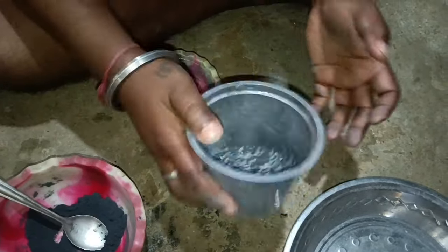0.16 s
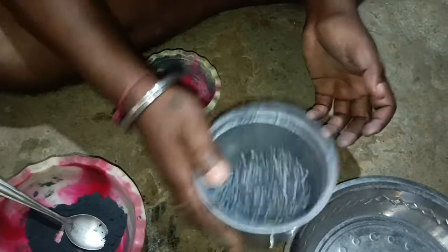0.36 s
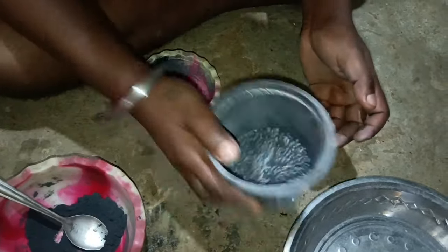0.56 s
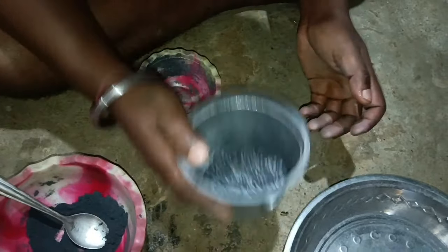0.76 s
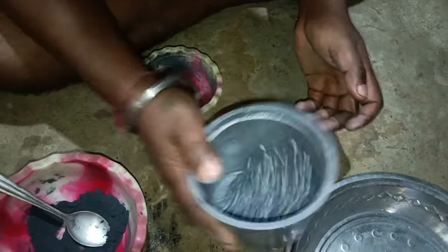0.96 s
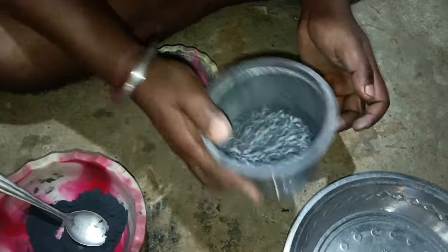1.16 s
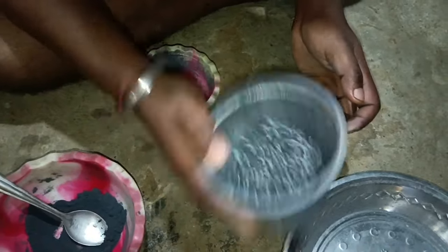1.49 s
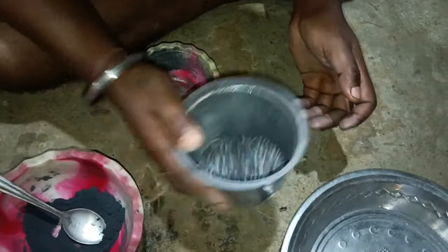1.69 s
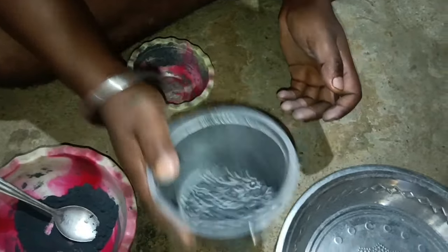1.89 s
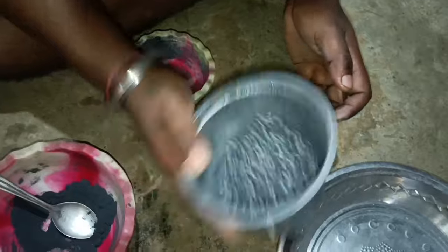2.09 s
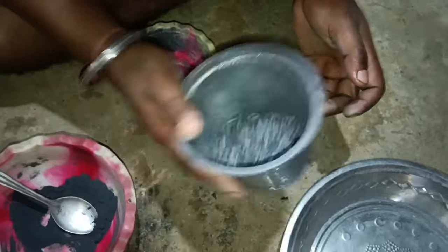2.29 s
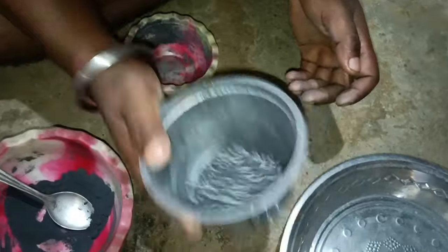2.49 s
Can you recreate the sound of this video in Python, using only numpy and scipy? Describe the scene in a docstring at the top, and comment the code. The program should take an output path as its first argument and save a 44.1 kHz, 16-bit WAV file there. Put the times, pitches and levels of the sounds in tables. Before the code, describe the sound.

Bright, busy rattling of tiny pellets swirled to and fro inside a small metal cup indoors

```python
"""A bright, busy rattle close to a phone: small hard pellets slide to and fro in a hand-held steel cup,
about seven strokes a second. Thousands of tiny ticks are short resonances hit by random blows.
Rolling pellets and heavier knocks ring the hollow of the cup, damped by the hand; single ticks crack on top.
Behind it a low rumble of coloured noise comes and goes, with a brief wavering hum and dull thuds."""
import sys
import numpy as np
from scipy import signal
from scipy.fft import rfft, irfft
from scipy.io import wavfile

SR = 44100
rng = np.random.default_rng(int(sys.argv[2]) if len(sys.argv) > 2 else 0)


def master_out(mix):
    """Clip the mix to full scale and print it as 16-bit PCM to the path in sys.argv[1]."""
    frames = np.transpose(np.atleast_2d(mix))
    ceiling = np.clip(frames, -1, 1)
    pcm = np.round(ceiling * 32767).astype(np.int16)
    wavfile.write(sys.argv[1], SR, pcm)


N = 116865

LAG_S = .0001  # every blow reaches the left this much after the right, before any further lag
TICK_LAG_S, TICK_LAG_SPREAD_S = .00007, .00011  # extra lag of the ticks, and its scatter
KNOCK_LAG_SPREAD_S = .00005

# Strokes of the pellets, as mix automation before each layer's fixed trim: t/s, tick level/dB,
# hollow over ticks level/dB, top treble level/dB (only its swing about the mean counts),
# low rings over ticks level/dB
STROKES = [(0.0, -47, 6, -7, -25), (0.04, -51, 1, -21, -32), (0.07, -52, 15.5, -3, -9),
           (0.12, -28.5, 2.5, -19.5, -5.5), (0.17, -36.5, 8, -11.5, -3.5), (0.24, -32, -1.5, -14, -20),
           (0.25, -27.5, -25, -15, -24), (0.26, -33.5, -6, -9, -20), (0.3, -37, -10, -11, -7),
           (0.35, -32.5, 10.5, -12.5, -9.5), (0.38, -36, 10, -10, -3), (0.41, -42.5, 8, -14, 1),
           (0.45, -30, 1.5, -10, -13), (0.5, -25.5, -4, -17.5, -28), (0.57, -38, 2, -17, -42),
           (0.6, -26.5, -6.5, -16, -35), (0.62, -26.5, 6.5, -14, -47), (0.66, -30, 5.5, -17, -23),
           (0.69, -45, 13.5, -8.5, 8), (0.74, -26.5, 4.5, -15, -3.5), (0.83, -30, 0, -20, -4.5),
           (0.89, -33, 3.5, -18.5, 4), (0.91, -26, 3.5, -17, -11), (1.0, -40.5, 10.5, -14, -2),
           (1.05, -24, -0.5, -13.5, -16), (1.13, -31.5, 0.5, -17, -21), (1.14, -35, -2, -12, -35),
           (1.15, -38, 1, -14, -23), (1.19, -27, -1, -20.5, -9), (1.22, -27, 12, -10, -4),
           (1.28, -43, 7.5, -16.5, -2), (1.34, -25, 1, -15.5, -13.5), (1.38, -28.5, 2.5, -17.5, -16),
           (1.42, -36, 8.5, -18, -18), (1.45, -34, -2, -15, -12), (1.53, -26, 8, -19, -10),
           (1.55, -34, 9, -19, 2), (1.58, -37.5, 11, -12, -5), (1.65, -27.5, 2, -14.5, -10.5),
           (1.73, -33.5, 2, -15, -30), (1.76, -30.5, -4, -17, -30), (1.78, -26, 2.5, -19.5, -9.5),
           (1.87, -38, 9.5, -13.5, -2), (1.91, -31, 6.5, -13, -15), (1.93, -24, -3, -22, -21),
           (1.95, -30, 1.5, -15, -13.5), (2.01, -31, 4, -17.5, -18), (2.02, -31, 0, -23, -16),
           (2.03, -32.5, 0.5, -14, -9), (2.07, -30.5, 4, -16, -18), (2.08, -27.5, 0, -20, -7),
           (2.1, -26.5, 6, -12, -15), (2.16, -40, 11, -16.5, -6), (2.21, -29.5, 0.5, -13, -15),
           (2.27, -29.5, 1.5, -16.5, -13.5), (2.35, -36.5, 6.5, -12.5, -12), (2.38, -27.5, 2.5, -16, -8.5),
           (2.42, -29, 6.5, -16.5, -5), (2.44, -36.5, 10.5, -10, 3), (2.46, -39, 11.5, -13, -1),
           (2.55, -27, 1, -17, -8.5), (2.61, -34, 4.5, -17, -18), (2.65, -35, 3, -11, -1)]
# Tone colour of the ticks: f/Hz, relative level/dB
TICK_COLOUR = [(650, -7.5), (1100, -1), (1430, -1.5), (1710, 2), (1890, -3), (2040, 0), (2460, -3.5),
               (3500, -3.5), (4880, -6), (6360, -15.5), (7670, -8), (8760, -16.5), (9050, -31.5),
               (9350, -47.5), (10100, -28.5), (11400, -37), (12700, -34.5), (15400, -50)]
# The cup drifts to the right: t/s, left minus right level/dB
DRIFT = [(0, 1), (1.3, 0), (2.3, -0.9), (2.65, -3.5)]
TICK_RATE, TICK_SCATTER_DB, TICK_Q = 600, 1.5, 8  # rate is ticks a second in each pitch range
FINE_HZ, FINE_DENSER = 9000, 8  # above this pitch the tick rate is this many times higher
SHARED_PER_S, SHARED_DB, SHARED_SCATTER_DB = 300, -10, 2.5  # ticks that sound at all pitches up to FINE_HZ


def ticks():
    """Pellet on pellet and on steel: blows ring short resonances at all pitches, following the strokes."""
    out = 0
    shared = undb(SHARED_DB) * hail(SHARED_PER_S, SHARED_SCATTER_DB, TICK_LAG_SPREAD_S, TICK_LAG_S)
    level, top = curve(STROKES, column=1), curve(STROKES, column=3)
    for hz in 1000 * 2 ** np.arange(0, 4, .16):
        fine = hz > FINE_HZ  # the highest pitches blur into a hiss
        rate = TICK_RATE * (FINE_DENSER if fine else 1)
        hits = hail(rate, TICK_SCATTER_DB, TICK_LAG_SPREAD_S, TICK_LAG_S)
        if not fine:
            hits = hits + shared
        # the treble swing fades in from 4 to 8 kHz
        bright_db = np.clip(np.log2(hz / 4000), 0, 1) * (top - top.mean())
        band = signal.lfilter(*signal.iirpeak(hz, TICK_Q, SR), hits)
        out = out + band * undb(bright_db) * patches()

    def tilt(hz):
        below_1k = np.maximum(np.log2(1000 / hz), 0)
        return at_hz(TICK_COLOUR, hz) - 24 * below_1k

    pan_db = curve(DRIFT, column=1) * np.array([[.5], [-.5]])
    return unit(colour(out, tilt)) * undb(level + 2.5 + pan_db)


# Modes of the cup's hollow: f/Hz, relative level/dB, t60/s
HOLLOW = [(601, -6.5, 0.08), (678, 6.5, 0.031), (794, -9.5, 0.056), (784, 11.5, 0.028), (899.7, 6, 0.033),
          (872, 1.5, 0.063), (952, 7, 0.022), (1204, -8, 0.051)]
HOLLOW_WANDER = 0.028  # share by which each mode slides as the grip shifts
ROLL_PER_S, ROLL_SCATTER_DB = 300, 1  # small knocks, for each mode


def roll():
    """One hit in a stream of small random knocks after another, as rolling pellets strike the cup."""
    return hail(ROLL_PER_S, ROLL_SCATTER_DB, KNOCK_LAG_SPREAD_S)


def rolling_hollow():
    """Rolling pellets ring the damped hollow; each mode is struck from other spots and slides in pitch."""
    out = 0
    for hz, db, t60 in HOLLOW:
        pitch = hz * (1 + HOLLOW_WANDER * wander(11))
        out = out + undb(db) * sliding_ring(roll(), pitch, t60)
    return unit(out) * undb(curve(STROKES, column=1) + curve(STROKES, column=2) - 1.5)


# Heavier knocks on the cup: t/s, level/dB before trim and sharing among modes, f/Hz
KNOCKS = [(0.083, -20.5, 600), (0.346, -11, 840), (0.401, -11, 840), (0.454, -12, 745), (0.472, -12, 722),
          (0.624, -38, 990), (0.644, -20, 830), (0.708, -25, 724), (0.73, -17, 836), (0.827, -12.5, 486),
          (0.881, -14, 584), (0.917, -12, 810), (0.997, -14, 800), (1.062, -14, 880), (1.19, -14, 800),
          (1.241, -8.5, 785), (1.501, -10, 690), (1.607, -9, 700), (1.66, -10, 840), (1.778, -25, 845),
          (1.815, -6.5, 910), (1.838, -16, 780), (1.901, -7.5, 732), (1.968, -13.5, 715), (2.095, -11, 870),
          (2.143, -9, 830), (2.205, -19, 726), (2.238, -13.5, 870), (2.396, -13.5, 844), (2.44, -12, 780)]
KNOCK_OCTAVES, KNOCK_DB = .22, -1.5  # how far a knock reaches to other modes; trim of all knocks
KNOCK_PUSH_S, KNOCK_REBOUNDS = .0007, 2  # length of each soft push; further landings after the first


def knocks():
    """Heavy knocks excite the hollow, most strongly in the modes near each knock's own pitch."""
    t, knock_db, pitch = np.array(KNOCKS).T
    spot = rng.standard_normal(len(t))
    near = []
    for hz, db, _ in HOLLOW:
        octaves = np.log2(pitch / hz)
        near.append(undb(db) * np.exp(-(octaves / KNOCK_OCTAVES) ** 2))
    near = np.array(near)
    push = np.hanning(int(KNOCK_PUSH_S * SR) + 2)
    out = 0
    for (hz, _, t60), share in zip(HOLLOW, near / near.sum(0)):
        size = undb(knock_db + KNOCK_DB) * share / KNOCK_REBOUNDS
        # a clump of pellets lands over a few swings of the wall
        hit = sum(blows(t + k / pitch, size, KNOCK_LAG_SPREAD_S, spot) for k in range(KNOCK_REBOUNDS + 1))
        out = out + ring(signal.lfilter(push / push.sum(), 1, hit), hz, t60)
    return out


# Lower rings of the cup: f/Hz, relative level/dB, t60/s
LOW_RINGS = [(349, -2, 0.047), (420.3, -0.5, 0.076), (485, -1.5, 0.063)]


def low_rings():
    """Rolling pellets also ring the cup's lower modes, which hold their pitch."""
    out = unit(sum(undb(db) * ring(roll(), hz, t60) for hz, db, t60 in LOW_RINGS))
    return out * undb(curve(STROKES, column=1) + curve(STROKES, column=4) - 4.5)


# Single sharp ticks: t/s, level/dB of the blow, f/Hz, left minus right level/dB,
# crack relative level/dB
CLICKS = [(.2048, -19.5, 3300, -1, -1.5), (.2292, -17.5, 2700, -13, -16), (0.2486, -14, 3160, -3, 1),
          (0.2662, -27, 3300, -5, 2), (.278, -21.5, 3100, -9, -19), (.308, -20, 3840, -3, -12),
          (0.337, -21, 3900, 0, -18), (0.377, -27.5, 4470, -9, 5.5), (0.5917, -31, 1520, 0, 2),
          (0.8808, -17, 1230, -7, -19), (1.026, -24, 2600, -7, -3), (1.1354, -14, 3620, -6, -11),
          (1.328, -20, 4500, -6, -6), (1.6266, -17.5, 2850, -5, 0), (1.632, -25, 3250, -5, -3),
          (1.65, -26, 2090, -5, -7), (1.774, -16, 2800, -3, -25), (1.796, -12, 2820, -8, -24),
          (1.8173, -15, 1720, -7, -14), (1.9257, -19, 3300, -4, -2), (2.018, -16, 2930, -9, -19),
          (2.0764, -17, 2240, -3, -4.5), (2.208, -18, 2150, -5, -3), (2.368, -17.5, 2200, -9, -20),
          (2.633, -22, 2800, -9, 0)]
# Wide crack on top of each: f/Hz, relative level/dB, t60/s
CRACK = [(5300, 0, .005), (7700, -3, .004)]
CLICK_T60_S, CLICK_TOP_HZ = .0055, 9000


def clicks():
    """Sharp single ticks: one blow drives a short ring and a wide crack of higher modes."""
    out = 0
    for t, db, hz, pan_db, crack_db in CLICKS:
        blow = blows(np.array([t]), undb(db), 0, 0)[0]
        crack = sum(undb(crack_db + d) * ring(blow, f, t60) for f, d, t60 in CRACK)
        click = ring(blow, hz, CLICK_T60_S) + crack
        out = out + click * undb(np.array([[.5], [-.5]]) * pan_db)
    return signal.sosfilt(signal.ellip(6, .5, 35, CLICK_TOP_HZ, fs=SR, output="sos"), out)


# Stereo colour of ticks, hollow and low rings: f/Hz, left minus right level/dB
LEFT_OVER_RIGHT = [(60, -17.5), (110, 4), (200, 6), (380, -2), (700, -2.0), (1290, 0), (2370, -10),
                   (4380, -1.5), (8080, 0), (14900, -1.5)]
CUP_LOW_HZ, HOLLOW_LOW_HZ = 281, 487  # the small cup sends out little below these


def cup():
    """Mix of all cup layers, thinned in the bass because a small cup radiates little there."""
    body = ticks() + low_rings() + high_pass(rolling_hollow() + knocks(), 3, HOLLOW_LOW_HZ)
    sides = []
    for side, sign in enumerate((.5, -.5)):
        sides.append(colour(body[[side]], lambda hz: sign * at_hz(LEFT_OVER_RIGHT, hz))[0])
    return high_pass(np.array(sides) + clicks(), 8, CUP_LOW_HZ)


ROOM_DB, ROOM_T60_S = -21.5, 0.022


def room(x):
    """Short reverb: a decaying noise tail of unit energy, starting after 4 ms."""
    t = np.arange(SR // 2) / SR
    tail = rng.standard_normal((2, len(t))) * undb(-60 * t / ROOM_T60_S) * (t > .004)
    tail = tail / np.sqrt((tail ** 2).sum(1, keepdims=True))
    return undb(ROOM_DB) * signal.fftconvolve(x, tail, axes=1)[:, :N]


# Dull thuds: t/s, level/dB of the blow
THUDS = [(0.4013, -5.5), (.789, -3.5), (.808, -14), (.839, -9), (0.8812, -4), (.9, -9)]
# Modes of a thud: f/Hz, relative level/dB, t60/s
THUD_MODES = [(107, -57, 0.17), (218, -64, .1), (443, -24.5, 0.056), (608, -32, 0.12), (1370, -14, 0.019)]
THUD_LOW_HZ = 80


def thuds():
    """Dull thuds: blows trimmed of the deepest bass ring a few mostly low modes."""
    t, thud_db = np.array(THUDS).T
    hit = high_pass(blows(t, undb(thud_db), 0, 0), 2, THUD_LOW_HZ)
    return sum(undb(db) * ring(hit, hz, t60) for hz, db, t60 in THUD_MODES)


# A soft low hum, before wavering and fade: t/s, f/Hz, level/dB
HUM = [(0, 114, -62), (.03, 112, -53), (.09, 120, -62), (.13, 130, -56), (.19, 142, -56), (.25, 135, -64)]
HUM_WAVER_HZ = 6


def hum():
    """Short sine hum, wavering in pitch and level, that fades out by the end of its table."""
    pitch = curve(HUM, column=1) + HUM_WAVER_HZ * wander(60)
    tone = np.sqrt(2) * np.sin(2 * np.pi * np.cumsum(pitch) / SR)
    fade = np.clip((HUM[-1][0] - np.arange(N) / SR) / 0.11, 0, 1)
    return tone * undb(curve(HUM, column=2)) * fade * patches()


# Rumble automation, before flutter and the opening rise: t/s, level/dB
RUMBLE = [(0.18, -57), (0.33, -70), (0.41, -46), (0.43, -47), (0.49, -73), (0.58, -75), (0.67, -74),
          (0.77, -33.5), (0.91, -41), (0.93, -46), (0.98, -49), (1.01, -63), (1.17, -77), (1.22, -68),
          (1.58, -74), (1.65, -63), (1.72, -73), (2.15, -71), (2.65, -70)]
# Tone colour of the rumble: f/Hz, relative level/dB
RUMBLE_COLOUR = [(15, -41), (25, -37), (37, -31), (58, 5), (102, 4.5), (139, 4.5), (226, 4), (280, -17),
                 (360, -68), (620, -120)]
RUMBLE_SIDE_DB, RUMBLE_FLUTTER_DB, RUMBLE_RISE_S = -15, 1.5, .2


def rumble():
    """Low uneven rumble: coloured noise, nearly the same left and right, that comes and goes."""
    mid, side = colour(rng.standard_normal((2, N)), lambda hz: at_hz(RUMBLE_COLOUR, hz))
    noise = unit(mid + undb(RUMBLE_SIDE_DB) * side * np.array([[1], [-1]]))
    level_db = curve(RUMBLE, column=1) + RUMBLE_FLUTTER_DB * wander(39.5)
    rise = np.minimum(np.arange(N) / SR / RUMBLE_RISE_S, 1) ** 2
    return noise * undb(level_db) * rise


def blows(t, size, spread_s, chance):
    """Impulses at both microphone ports; each comes from its own spot, so its lag differs."""
    out = np.zeros((2, N + 2))
    lag = LAG_S + spread_s * chance
    for side, sign in enumerate((.5, -.5)):
        place = np.clip((t + sign * lag) * SR, 0, N)
        i = place.astype(int)
        # share each impulse between two samples for a finer lag
        np.add.at(out[side], i, size * (1 - place + i))
        np.add.at(out[side], i + 1, size * (place - i))
    return out[:, :N]


def hail(rate, scatter_db, spread_s, later_s=0):
    """Random blows, rate a second, of either sign and exponentially scattered dB size, at unit RMS."""
    draw = rng.random((N // 4, 4))[:int(rate * N / SR)]
    size_db = np.minimum(-np.log(1 - draw[:, 1]), 5) * scatter_db
    size = undb(size_db) * np.sign(draw[:, 2] - .5)
    chance = (draw[:, 3] - .5) * np.sqrt(12) + later_s / spread_s
    return unit(blows(draw[:, 0] * N / SR, size, spread_s, chance))


def ring(x, hz, t60):
    """One decaying mode: a two-pole resonator, peak near 1 for a unit blow."""
    r, w = np.exp(-np.log(1000) / (t60 * SR)), 2 * np.pi * hz / SR
    return signal.lfilter([0, np.sin(w)], [1, -2 * r * np.cos(w), r * r], x)


def sliding_ring(x, hz, t60):
    """One decaying mode whose pitch moves from sample to sample, by a turning complex phase."""
    turn = np.exp(2j * np.pi * np.cumsum(hz) / SR)
    decay = np.exp(-np.log(1000) / (t60 * SR))
    return (signal.lfilter([1], [1, -decay], x / turn) * turn).imag


def colour(x, db_of):
    """Causal minimum-phase filter with the given gain curve, built by folding the cepstrum."""
    size = 4096
    cep = irfft(db_of(np.maximum(np.fft.rfftfreq(size, 1 / SR), 1)) * np.log(10) / 20)
    cep[1:size // 2] *= 2
    cep[size // 2 + 1:] = 0
    impulse = irfft(np.exp(rfft(cep)))
    return signal.fftconvolve(x, impulse[None], axes=1)[:, :N]


def high_pass(x, order, hz):
    """Butterworth low cut."""
    return signal.sosfilt(signal.butter(order, hz, "high", fs=SR, output="sos"), x)


PATCHY_DB, PATCHES_PER_S = 3, 40


def patches():
    """Random gain that swells and fades by a few dB."""
    return undb(PATCHY_DB * wander(PATCHES_PER_S))


def wander(rate):
    """Random curve with a new value rate times a second, joined by straight lines."""
    steps = rng.standard_normal(400)
    return np.interp(np.arange(N) / SR * rate, np.arange(len(steps)), steps)


def curve(table, column):
    """One column of a time table, per sample."""
    table = np.array(table)
    return np.interp(np.arange(N) / SR, table[:, 0], table[:, column])


def at_hz(table, hz):
    """A spectrum table read on a log-frequency axis."""
    table = np.array(table)
    return np.interp(np.log(hz), np.log(table[:, 0]), table[:, 1])


def undb(db):
    """Decibels to amplitude factor."""
    return 10 ** (np.asarray(db) / 20)


def unit(x):
    """Scale to an RMS of 1."""
    return x / np.sqrt(np.mean(x ** 2))


def scene():
    """The cup and its short reverb in front, rumble, hum and thuds behind."""
    rattle = cup()
    return rattle + room(rattle) + rumble() + hum() + thuds()


TOP_HZ = 15500


def record(dry):
    """The phone cuts the top: a steep low-pass."""
    return signal.sosfilt(signal.ellip(10, .2, 70, TOP_HZ, fs=SR, output="sos"), dry)


dry = scene()
out = record(dry)
master_out(out)
```